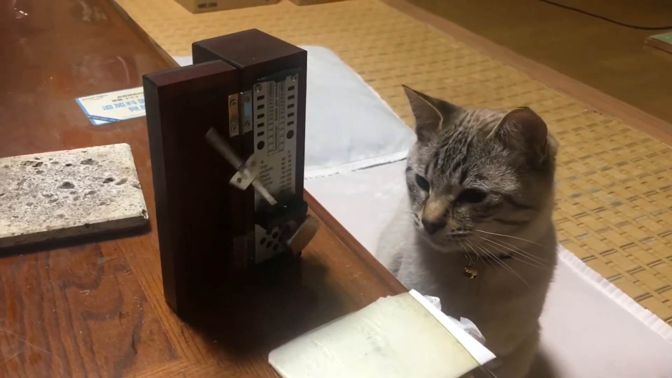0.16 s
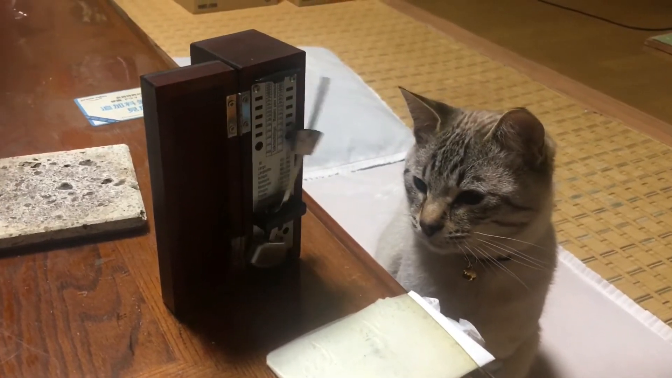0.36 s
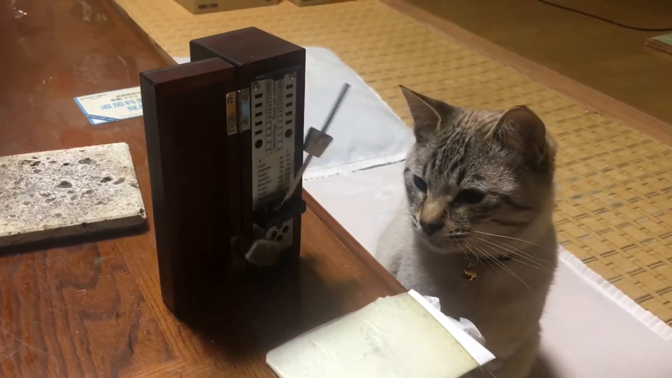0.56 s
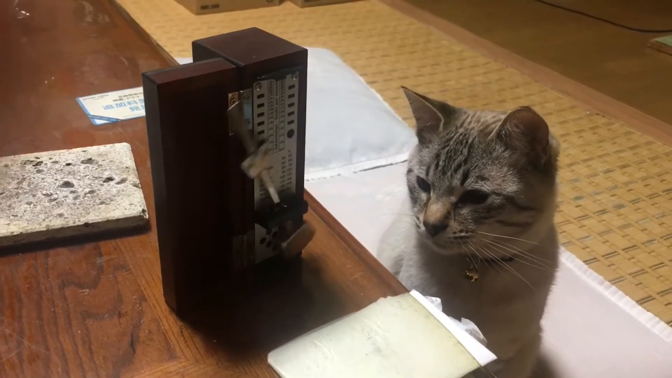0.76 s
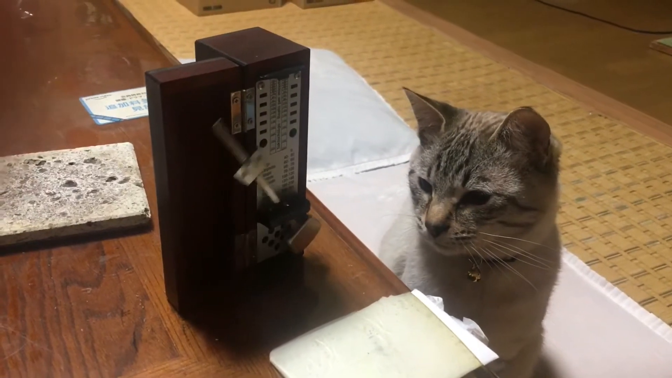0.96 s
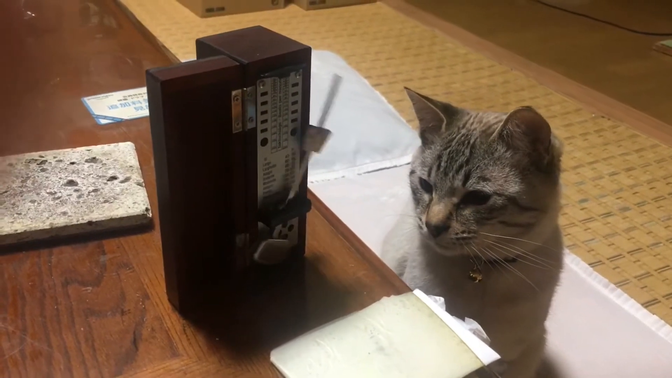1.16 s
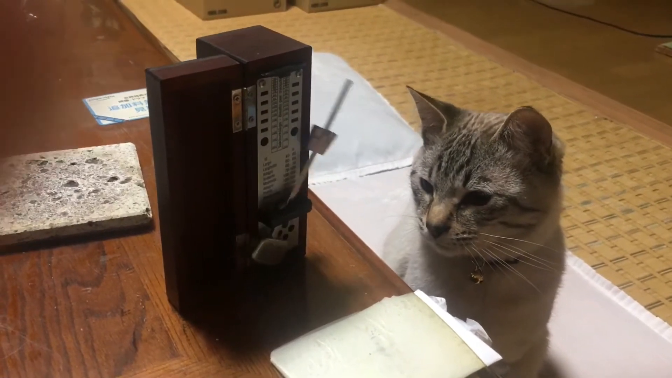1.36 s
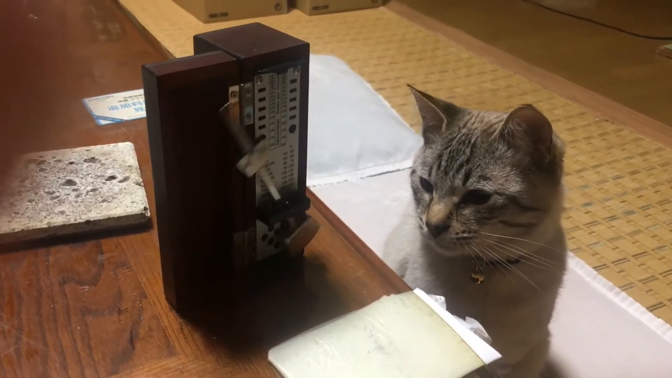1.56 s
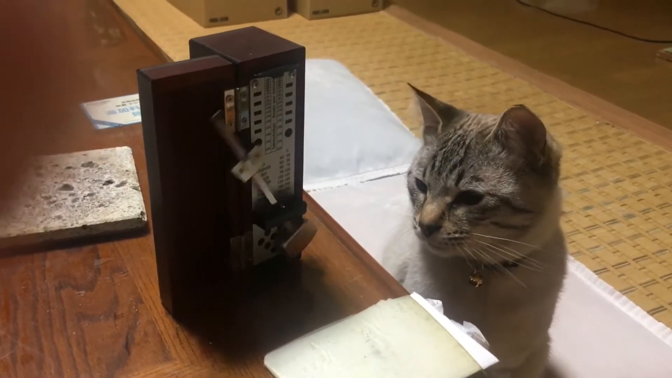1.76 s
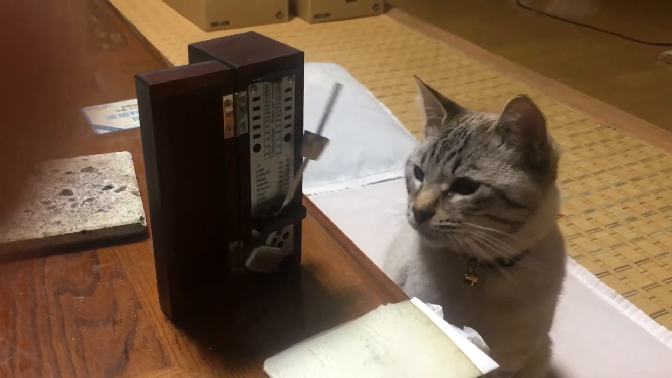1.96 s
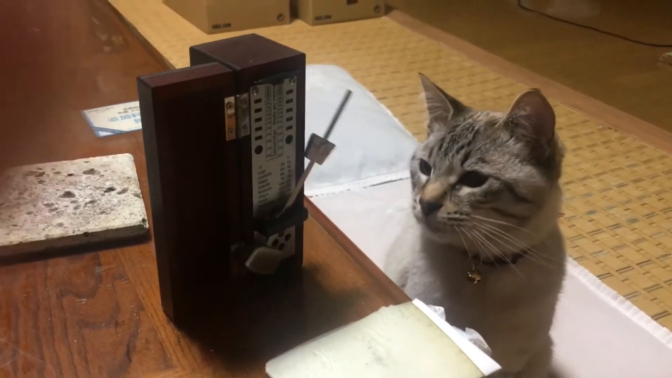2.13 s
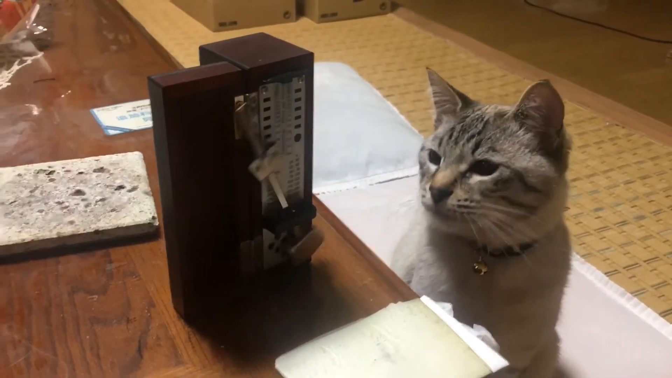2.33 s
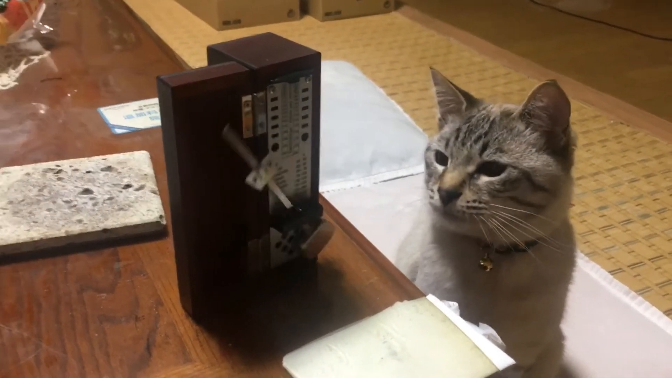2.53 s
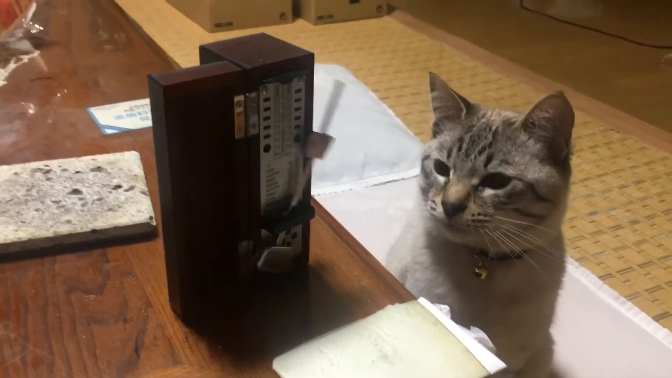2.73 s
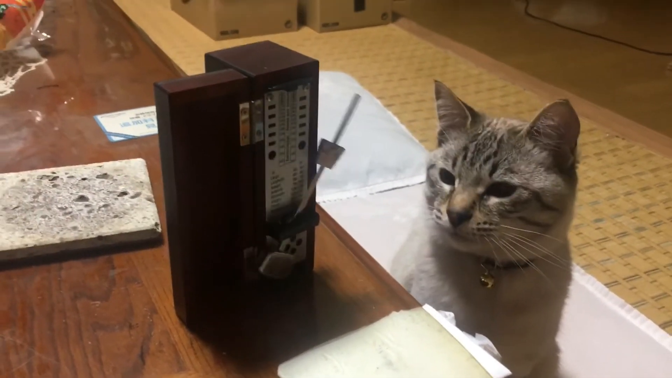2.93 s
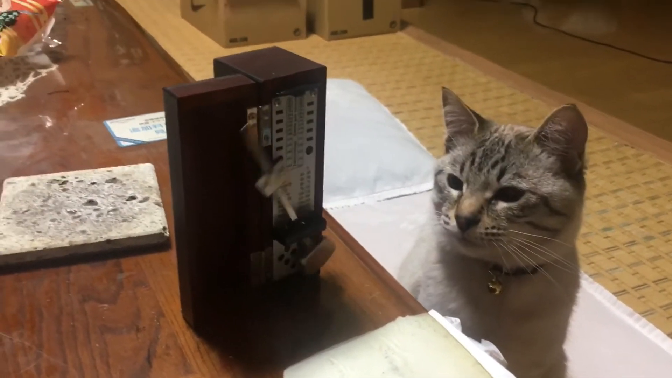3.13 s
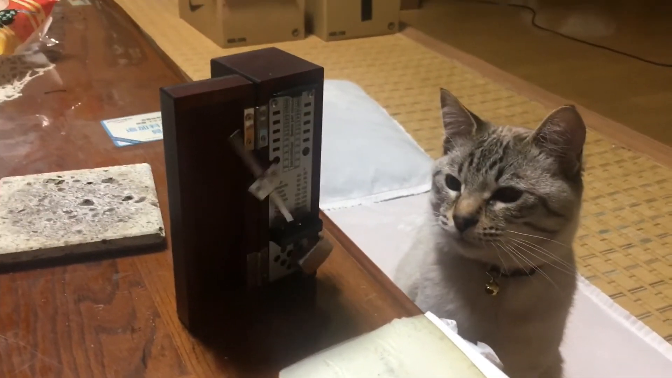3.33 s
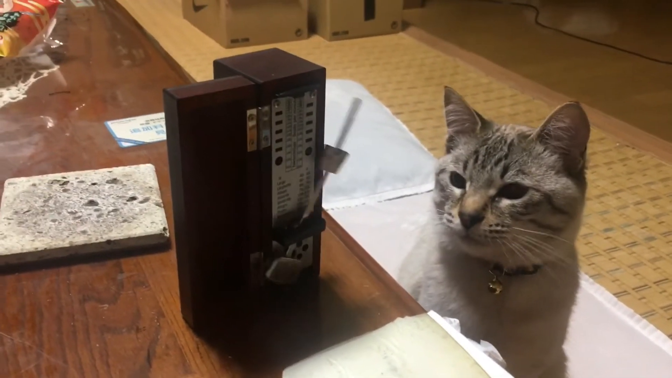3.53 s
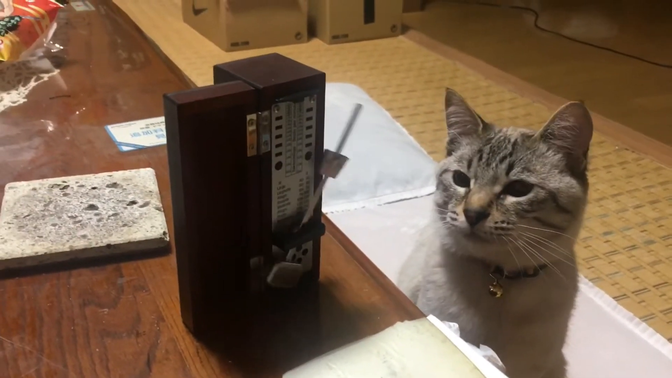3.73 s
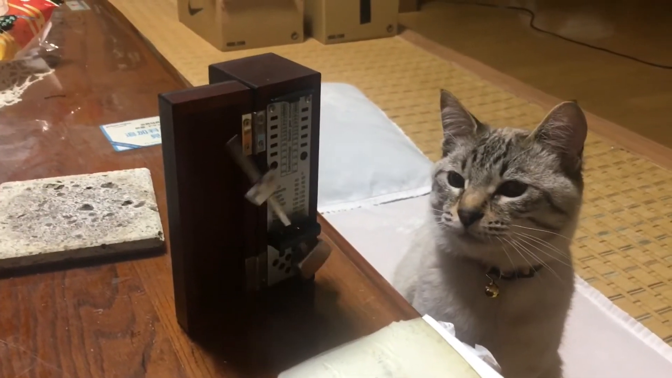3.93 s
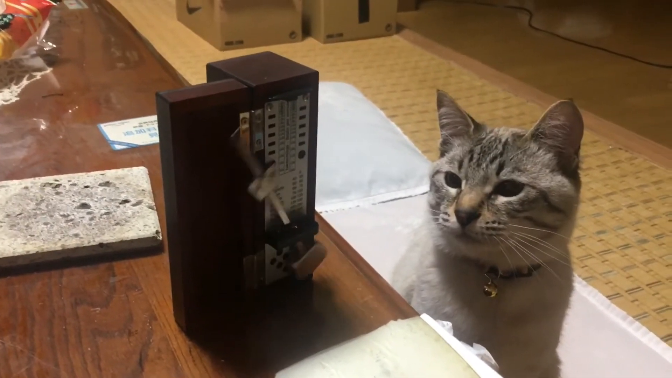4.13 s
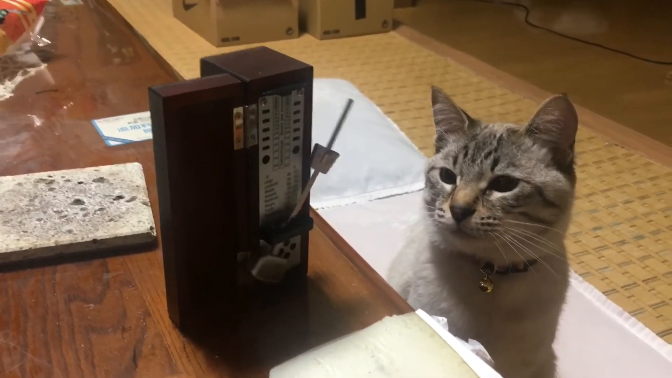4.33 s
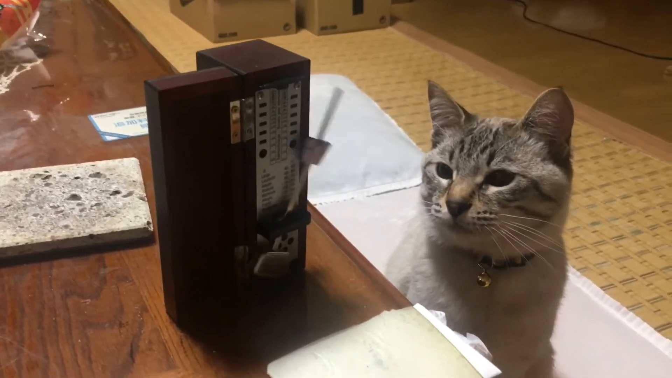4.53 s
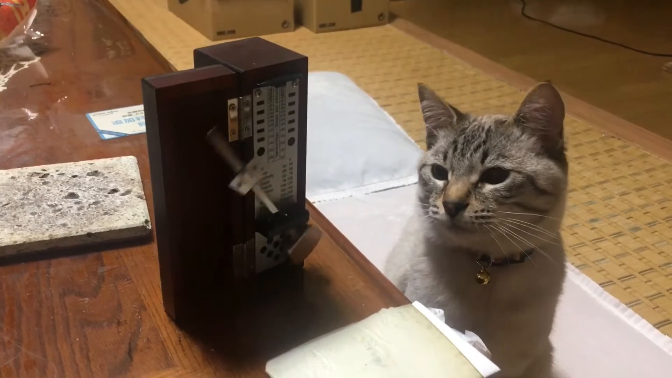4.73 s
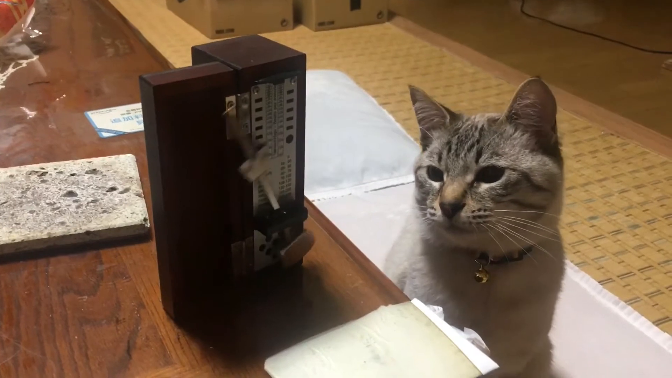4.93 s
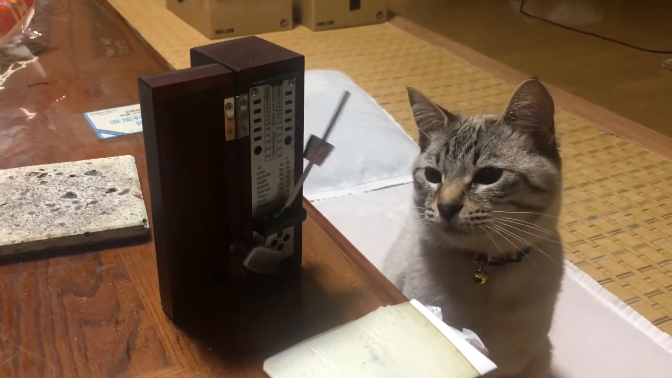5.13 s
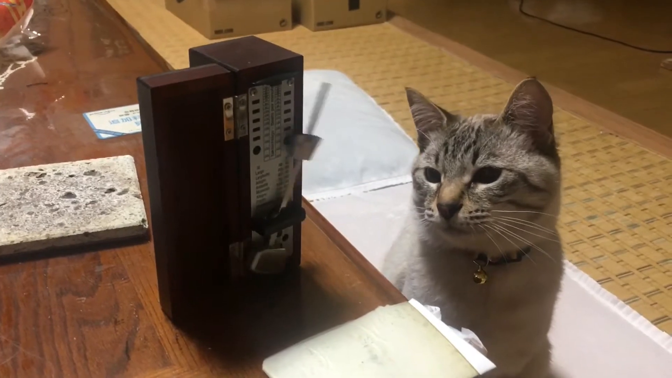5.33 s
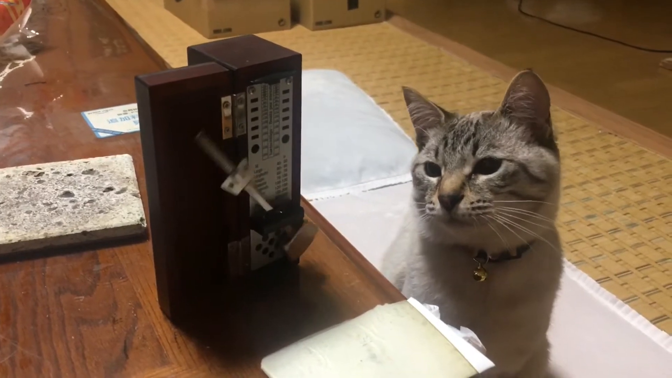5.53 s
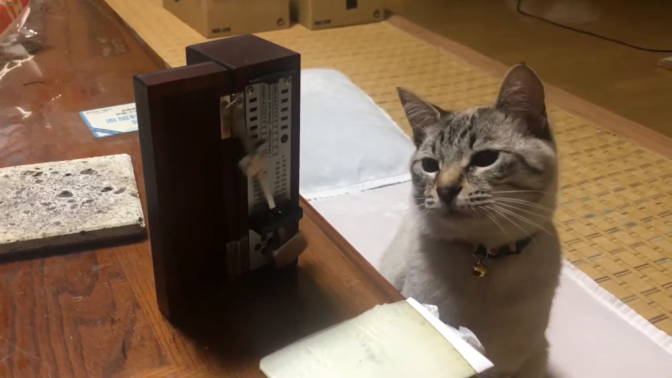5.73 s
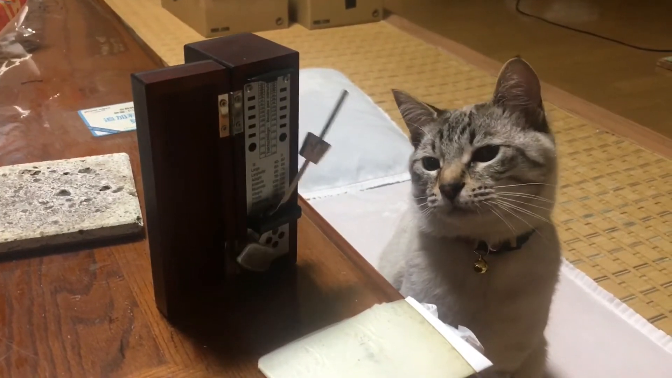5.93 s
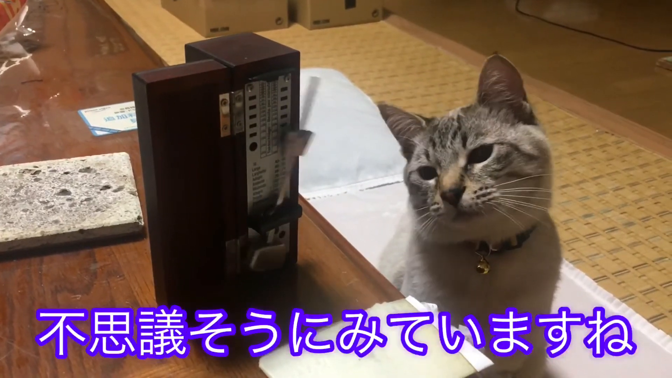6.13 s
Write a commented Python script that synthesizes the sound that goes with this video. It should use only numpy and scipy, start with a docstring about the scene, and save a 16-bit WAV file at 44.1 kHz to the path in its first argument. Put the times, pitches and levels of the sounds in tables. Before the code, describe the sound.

A wooden-cased pendulum metronome ticks steadily and briskly, its sharp dry clacks ringing briefly in a small quiet room over faint hum and hiss.

```python
"""A pendulum metronome in a wooden case ticks on a table at about 153 beats a minute, in a small quiet room.
Each swing trips the escapement: a crack of contact noise plus damped case modes, left and right voiced apart.
Every fourth beat adds a hollow note; narrow rings, nearby surfaces and a diffuse noise tail follow each tick.
Four soft bumps and taps, made of damped modes, come in between.
Underneath lie filtered-noise rumble, thin hiss and faint whistles, with a wavering sine-wave mains hum."""
import sys
import numpy as np
from scipy import signal
from scipy.fft import rfft, irfft, next_fast_len
from scipy.io import wavfile
from scipy.ndimage import map_coordinates

SR = 44100
rng = np.random.default_rng(int(sys.argv[2]) if len(sys.argv) > 2 else 0)


def output_pcm(signal):
    """Save a mono or channel-first signal as 16-bit PCM at the path in sys.argv[1].

    Samples are clipped to [-1, 1] before scaling.
    """
    pcm = np.clip(np.atleast_2d(signal).T, -1, 1) * 32767
    wavfile.write(sys.argv[1], SR, np.round(pcm).astype(np.int16))


N = 272538  # length in samples

# pendulum: first blow and spacing (s); left blows early and right blows late until it settles (s)
FIRST_S, BEAT_S = -0.0875, 0.39288
LIMP_S, SETTLED_S = 0.0018, 4.6
# blow strength, contact hardness and the beat-to-beat scatter of both (dB)
STRENGTH_DB, HARDNESS_DB, SCATTER_DB = -0.95, -2.0, -0.27
# the hand-held microphone moves to a new place between these times (s)
MOVE_FROM_S, MOVE_TO_S = 1.4, 2.8
# case and movement modes, before strength and place: [f/Hz, t60/s, left level/dB, right level/dB]
CASE_MODES = [(550.4, 0.14, -40, -38.5), (665, 0.037, -35, -30.5), (773, 0.045, -34.5, -36.5),
              (953, 0.057, -33, -34), (1075, .06, -40, -35.5), (1149, 0.055, -31, -29),
              (1405.7, 0.046, -23, -21), (1481.4, 0.024, -20, -17), (1949, 0.018, -12.5, -12.5),
              (2236, 0.011, -14, -15), (2870, 0.015, -19, -19), (3160, 0.036, -23.5, -24.5),
              (3448, 0.015, -9.5, -10), (3631, 0.014, -14.5, -14.5), (4447, 0.036, -27.5, -28),
              (4760, 0.048, -27, -26), (5155, .016, -40, -28), (5153, 0.036, -19.5, -19.5),
              (6260, 0.028, -19.5, -20), (7920, 0.015, -28.5, -26.5), (9410, 0.007, -24.5, -27.5),
              (12200, 0.013, -32.5, -29.5)]
# how the microphone's place weights the case modes: [f/Hz, first place level/dB, second place level/dB]
MIC_PLACES = [(1000, -0.5, -0.5), (2000, 0.56, -0.5), (3450, 2.5, 0), (4494, 0.5, 1), (5200, -5.5, 1.5),
              (6300, -2.5, -3.5), (7990, 1.5, -0.5), (11950, 0, 2)]
# relative colour of the contact crack: [f/Hz, level/dB]
CRACK_COLOUR = [(300, -25), (1000, 7.5), (2500, 2), (5500, 9.5), (7000, -2.5), (10000, -2), (12500, -7),
                (14300, -8), (15700, -12.5), (17000, -16.5)]
# hollow note of the wheelwork on every fourth beat: [f/Hz, t60/s, level/dB]
HOLLOW_MODES = [(765, 0.11, -33.5), (1028, 0.06, -29)]
# longer narrow rings in the tail of each tick, room echo included, some close enough to beat:
# [f/Hz, t60/s, level/dB]
TAIL_RINGS = [(1490, 0.2, -56.5), (1932, 0.33, -52), (3390, 0.24, -44.5), (3490, 0.29, -41),
              (3446, 0.16, -41), (3620, 0.1, -43.5), (6360, 0.053, -33)]
# dull boom of table and room after each blow: [f/Hz, t60/s, level/dB]
BOOM_MODES = [(185, 0.054, -46), (240, .08, -35.5), (300, 0.086, -37.5), (494, 0.033, -42),
              (592, 0.1, -35.5), (640.4, 0.077, -36.5)]
# reflections off near surfaces: [delay t/s, level/dB]
NEAR_SURFACES = [(.0046, -16), (.0092, -19), (0.0193, -24), (.0243, -38.5)]
# decay and relative colour of the room's answer: [f/Hz, t60/s, level/dB]
ROOM_ANSWER = [(200, 0.6, -11), (630, 0.37, 0.5), (875, 0.35, -2), (1370, 0.18, 5.5), (2546, 0.29, -8.5),
               (2880, 0.2, 4), (3450, 0.24, 9.5), (3700, 0.24, 11), (3990, 0.26, -4), (4330, 0.26, 5),
               (6800, 0.22, -2.5), (7120, 0.23, -9), (9640, 0.22, -11.5), (15950, 0.21, -43)]
# soft bumps and taps: [t/s, f/Hz, t60/s, level/dB]
SOFT_BUMPS = [(0.858, 2020, 0.051, -54), (2.515, 240, 0.049, -40), (2.818, 60, 0.083, -33.5),
              (3.954, 161, 0.1, -40)]
# background levels (rms dB), the rumble's before its swell and sway
RUMBLE_DB, HISS_DB = -54.5, -68.5
# relative colour of the rumble: [f/Hz, level/dB per Hz]
RUMBLE_COLOUR = [(18, -42), (30, -19.5), (45, -7), (80, -2.5), (125, -5.5), (200, -5), (295, -7),
                 (345, -12), (500, -18.5), (640, -20.5), (800, -24), (1400, -31.5), (1900, -60)]
# relative colour of the steady hiss: [f/Hz, level/dB per Hz]
HISS_COLOUR = [(700, -2), (1500, 3.5), (2700, 1.5), (3700, 0), (4400, -1.5), (4950, -10), (5600, -3),
               (7500, -8.5), (12000, -8.5), (14500, -13), (15700, -15.5), (16100, -44)]
# relative colour of the brighter hiss: [f/Hz, level/dB per Hz]
BRIGHT_HISS_COLOUR = [(1000, 0.5), (4000, 4), (7000, -2), (11000, 0), (14000, -6.5), (16000, -14.5)]
# mains hum, before its sway: [f/Hz, level/dB rms]
HUM_TONES = [(50, -64), (100, -66.5), (200, -66.5), (300, -66)]
# faint narrow whistles, before the swell: [f/Hz, width f/Hz, level/dB rms]
WHISTLES = [(498, 66, -70.5), (688, 16, -79), (2720, 90, -84.5), (4083, 92, -80), (5470, 120, -84.5)]
# one background swell: middle and half length (s)
SWELL_S, SWELL_HALF_S = 4.77, 0.98
# at its top: rise of the rumble, rise of the whistles (dB), level of the brighter hiss (rms dB)
RUMBLE_RISE_DB, WHISTLE_RISE_DB, BRIGHT_HISS_DB = 0.64, 4, -71
TOP_HZ = 16100  # upper band limit


def metronome(room_db=-7, echo_db=-22, boom_delay_s=0.008, drift_turns=0.28, fresh_db=-8):
    """The ticks in their room; its answer changes slowly as the hand-held microphone drifts."""
    out = np.zeros(N)
    t = np.arange(SR // 2) / SR
    first, second = room_tail(t), room_tail(t)
    contact = noise(CRACK_COLOUR, len(t))
    for beat, s in beats():
        chance = SCATTER_DB * rng.standard_normal(2)
        strength_db, bright_db = np.array([STRENGTH_DB, HARDNESS_DB]) + chance
        strength = amp(strength_db)
        direct = strength * tick(t, s, beat % 2, bright_db, contact)
        if beat % 4 == 2:
            direct = direct + strength * ring(HOLLOW_MODES, t, attack=0.003, scatter_db=0.5)
        add(out, s, direct)
        for delay, surface_db in NEAR_SURFACES:
            add(out, s + delay, amp(surface_db) * direct)
        # the drift turns one tail into another; a fresh part differs on every beat
        turn = 2 * np.pi * drift_turns * s * SR / N
        tail = np.cos(turn) * first + np.sin(turn) * second + amp(fresh_db) * room_tail(t)
        tail = tail / np.linalg.norm(tail)
        # sound thrown to the sides comes back diffuse; sound thrown forward keeps the case's modes
        add(out, s, amp(strength_db + room_db) * tail)
        add(out, s, amp(echo_db) * signal.fftconvolve(direct, tail))
        add(out, s, strength * ring(TAIL_RINGS, t, attack=0.0022, scatter_db=0.1))
        boom = ring(BOOM_MODES, t, attack=0.0013, scatter_db=0.0)
        add(out, s + boom_delay_s, strength * boom)
    return out


def beats():
    """The pendulum's blows, left and right in turn, limping until it settles: (count, time s)."""
    beat = np.arange(int((N / SR - FIRST_S) / BEAT_S) + 1)
    even = FIRST_S + beat * BEAT_S
    limp = LIMP_S * np.clip(1 - even / SETTLED_S, 0, 1)
    return enumerate(even - (-1) ** beat * limp)


def tick(t, s, swing, bright_db, contact, rattle_db=-26, rattle_t60=0.054, rattle_hz=8500,
         snap_db=-16, snap_t60=0.0048, split_hz=2800, fresh_db=-7):
    """One escapement blow: contact crack and ringing case; hardness sets the crack and the high modes."""
    modes = []
    for hz, t60, *sides in CASE_MODES:
        level_db = sides[swing] + bright_db * (hz > split_hz) + place_db(hz, s)
        modes.append((hz, t60, level_db))
    body = ring(modes, t, attack=0.0003, scatter_db=1.0)
    # the same parts meet on every beat, so the crack changes only in part
    grit = unit(contact + amp(fresh_db) * noise(CRACK_COLOUR, len(t)))
    snap = amp(snap_db) * grit * fade(t, snap_t60)
    # many tiny modes rattle on after the snap, a little duller
    dull_grit = filtered(grit, lambda hz: 1 / np.sqrt(1 + (hz / rattle_hz) ** 4))
    rattle = amp(rattle_db) * dull_grit * fade(t, rattle_t60)
    return body + amp(bright_db) * (snap + rattle)


def place_db(hz, s):
    """Weight of a mode at time s, as the microphone passes from its first place to its second."""
    moved = np.interp(s, [MOVE_FROM_S, MOVE_TO_S], [0, 1])
    points = [(f, first + moved * (second - first)) for f, first, second in MIC_PLACES]
    return along(points, hz)


def room_tail(t, build_up=0.0013):
    """One diffuse answer of the room: coloured noise in which each frequency dies at its own speed."""
    hz, when, z = signal.stft(rng.standard_normal(len(t)), SR, nperseg=256)
    table = np.array(ROOM_ANSWER)
    colour = amp(along(table[:, [0, 2]], hz))[:, None]
    decay = fade(when, along(table[:, :2], hz)[:, None])
    tail = signal.istft(z * colour * decay, SR, nperseg=256)[1][:len(t)]
    tail = tail * (1 - np.exp(-(t / build_up) ** 2))
    return tail / np.linalg.norm(tail)


def bump(overtone_db=-5, overtone_ratio=1.6, overtone_life=0.55):
    """Soft knocks and taps: one damped mode with a shorter overtone."""
    out = np.zeros(N)
    t = np.arange(SR // 2) / SR
    for s, hz, t60, db in SOFT_BUMPS:
        overtone = (overtone_ratio * hz, overtone_life * t60, db + overtone_db)
        add(out, s, ring([(hz, t60, db), overtone], t, attack=0.0013, scatter_db=1.5))
    return out


def background():
    """The bed under the ticks; rumble, whistles and a brighter hiss swell together once."""
    swell = np.exp(-((np.arange(N) / SR - SWELL_S) / SWELL_HALF_S) ** 2)
    return rumble(swell) + hiss(swell) + hum() + whistles(swell)


def rumble(swell, sway_db=2.0):
    """Low coloured noise whose level sways at random."""
    level_db = RUMBLE_DB + RUMBLE_RISE_DB * swell + sway_db * wobble(11)
    return amp(level_db) * noise(RUMBLE_COLOUR, N)


def hiss(swell):
    """Thin steady noise, joined by brighter noise during the swell."""
    steady = amp(HISS_DB) * noise(HISS_COLOUR, N)
    return steady + amp(BRIGHT_HISS_DB) * swell * noise(BRIGHT_HISS_COLOUR, N)


def hum(sway_db=-0.3, phase_sway_rad=0.84):
    """Mains hum: sines, each wavering in level and phase."""
    t = np.arange(N) / SR
    out = np.zeros(N)
    for hz, db in HUM_TONES:
        level = np.sqrt(2) * amp(db + sway_db * wobble(2.7))  # rms to peak
        out += level * np.sin(2 * np.pi * hz * t + phase_sway_rad * wobble(1.83))
    return out


def whistles(swell):
    """Noise through narrow resonances, so each band whistles faintly."""
    out = np.zeros(N)
    for hz, width, db in WHISTLES:
        band = filtered(rng.standard_normal(N), lambda f: 1 / (1 + ((f - hz) / width) ** 2) ** 2)
        out += amp(db) * unit(band)
    return amp(WHISTLE_RISE_DB * swell) * out


def ring(modes, t, attack, scatter_db):
    """Damped modes (Hz, t60 s, dB), neighbours in opposite phase, with chance in each mode's level."""
    chance = scatter_db * rng.standard_normal(len(modes))
    out = np.zeros(len(t))
    for k, (hz, t60, db) in enumerate(modes):
        level = (-1) ** k * amp(db + chance[k])
        out += level * fade(t, t60) * np.sin(2 * np.pi * hz * t)
    return out * (1 - np.exp(-t / attack))


def fade(t, t60):
    """Exponential decay that falls by 60 dB in t60."""
    return np.exp(-np.log(1000) * t / t60)


def noise(spectrum, size):
    """Coloured noise of rms 1."""
    return unit(filtered(rng.standard_normal(size), lambda hz: amp(along(spectrum, hz))))


def wobble(rate):
    """A smooth random curve, rate knots a second."""
    knots = rng.standard_normal(int(N * rate / SR) + 4)
    return map_coordinates(knots, [np.arange(N) * rate / SR])


def filtered(x, response):
    """x shaped by a response that is a function of frequency in Hz."""
    size = next_fast_len(len(x) + 8192)
    hz = np.fft.rfftfreq(size, 1 / SR)
    return irfft(rfft(x, size) * response(hz), size)[:len(x)]


def along(points, hz):
    """Read (Hz, value) points on a log frequency axis."""
    f, v = np.transpose(points)
    return np.interp(np.log(hz + 1), np.log(f + 1), v)


def add(track, s, sound):
    """Mix a sound into the track at time s; what falls outside is dropped."""
    start = round(s * SR)
    part = sound[max(-start, 0):max(len(track) - start, 0)]
    track[max(start, 0):][:len(part)] += part


def amp(db):
    """Decibels to amplitude."""
    return 10 ** (np.asarray(db) / 20)


def unit(x):
    """Scale to rms 1."""
    return x / np.sqrt(np.mean(x ** 2) + 1e-20)


def scene():
    """The metronome, the bumps and the quiet room, in mono."""
    return (metronome() + bump() + background())[None]


def record(dry):
    """A steep elliptic low-pass removes what lies above the band limit."""
    band_limit = signal.ellip(10, 0.1, 90, TOP_HZ, fs=SR, output="sos")
    return signal.sosfilt(band_limit, dry)


dry = scene()
out = record(dry)
output_pcm(out)
```